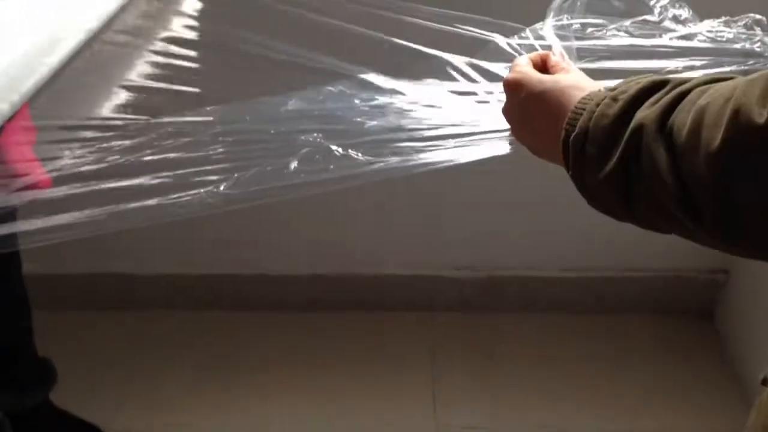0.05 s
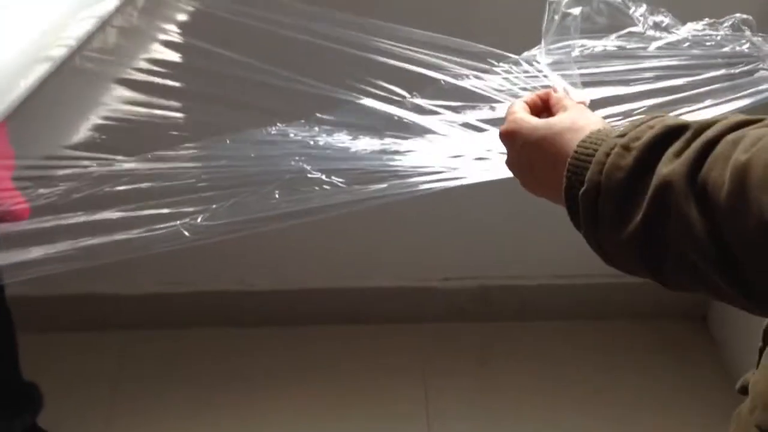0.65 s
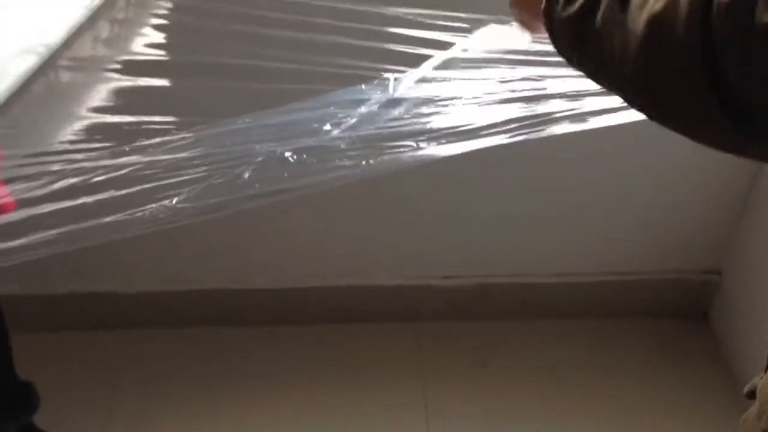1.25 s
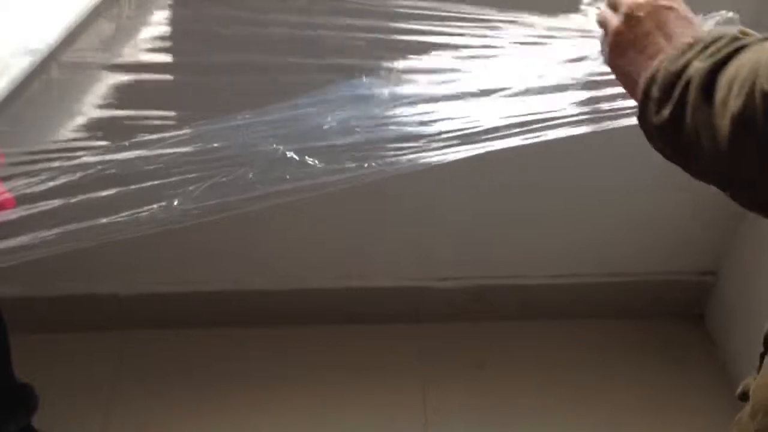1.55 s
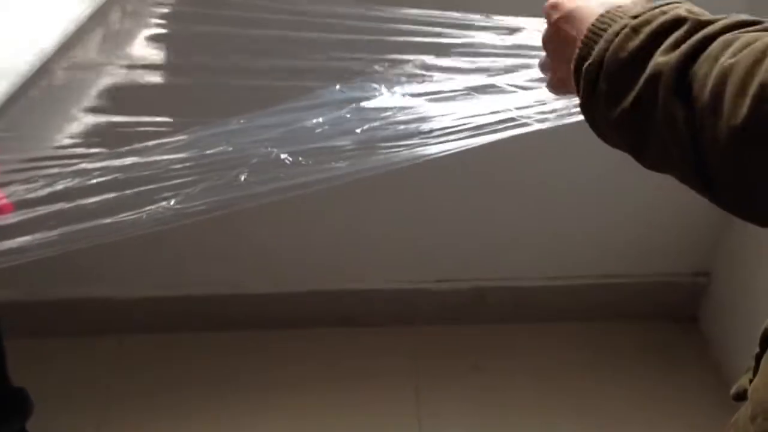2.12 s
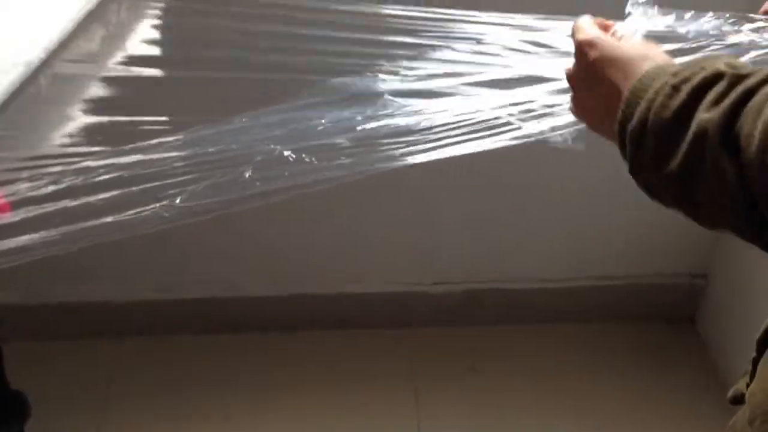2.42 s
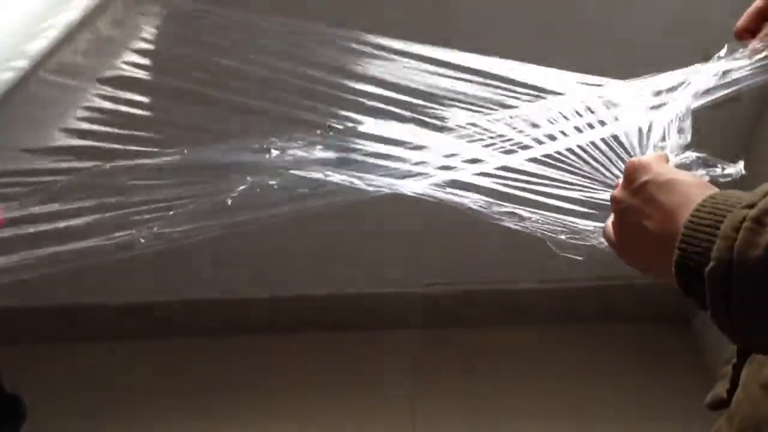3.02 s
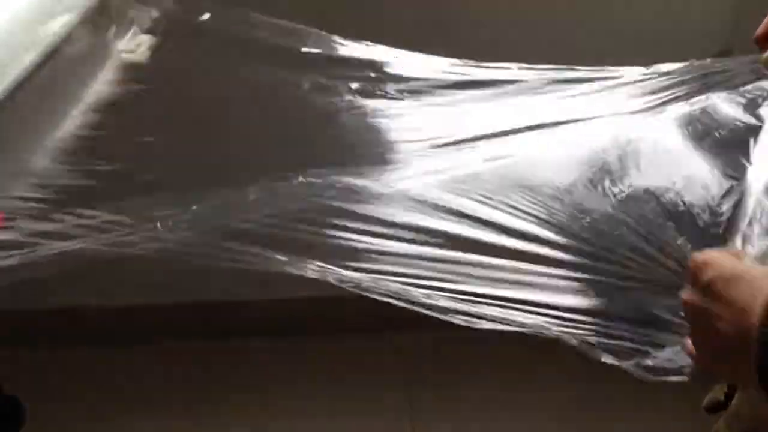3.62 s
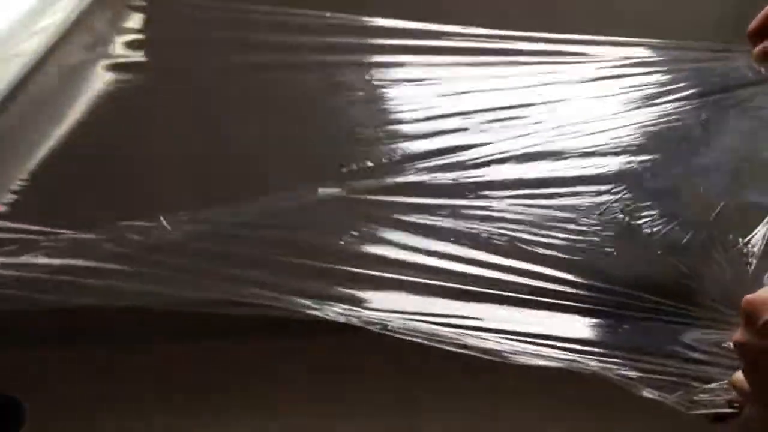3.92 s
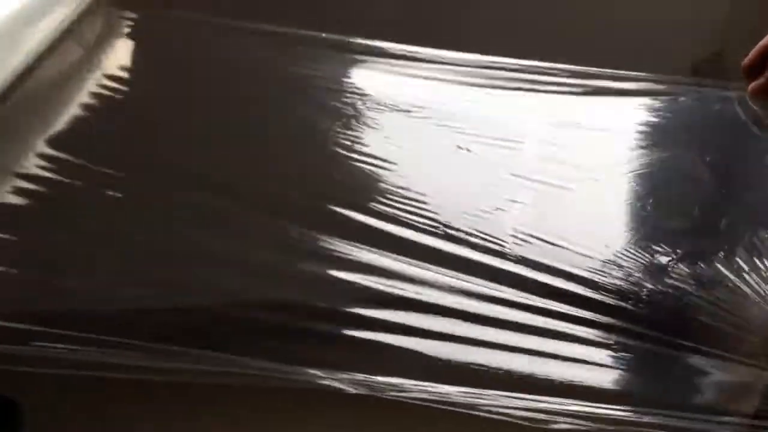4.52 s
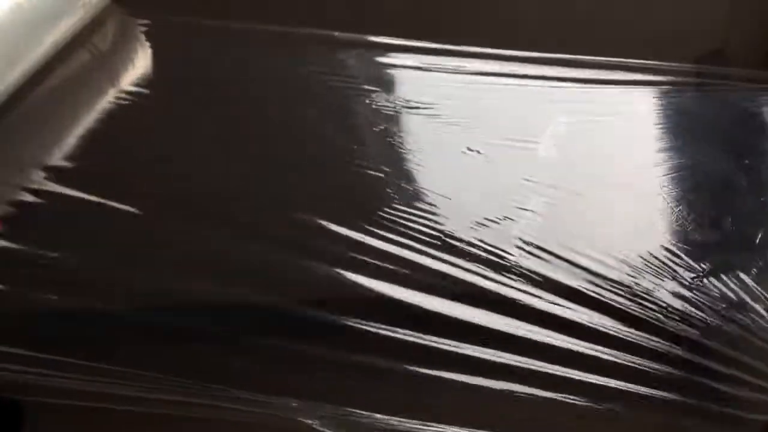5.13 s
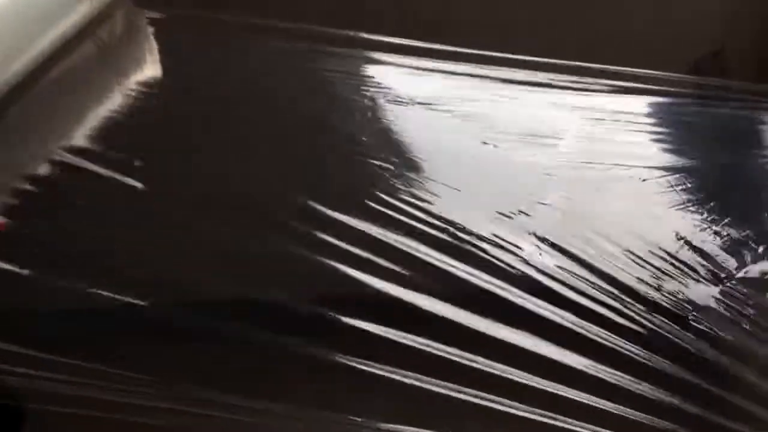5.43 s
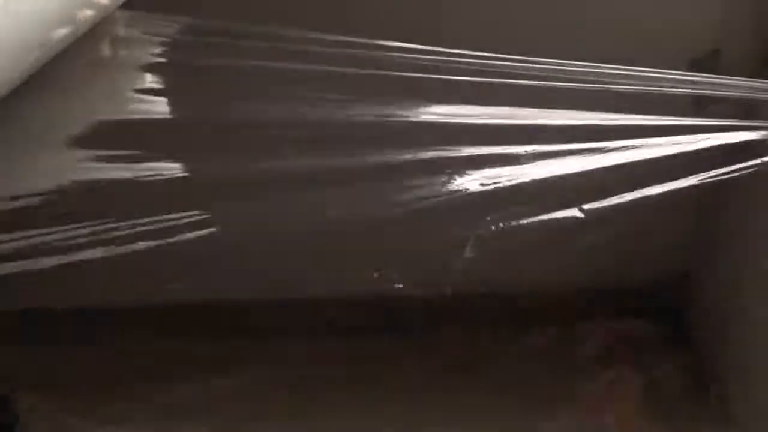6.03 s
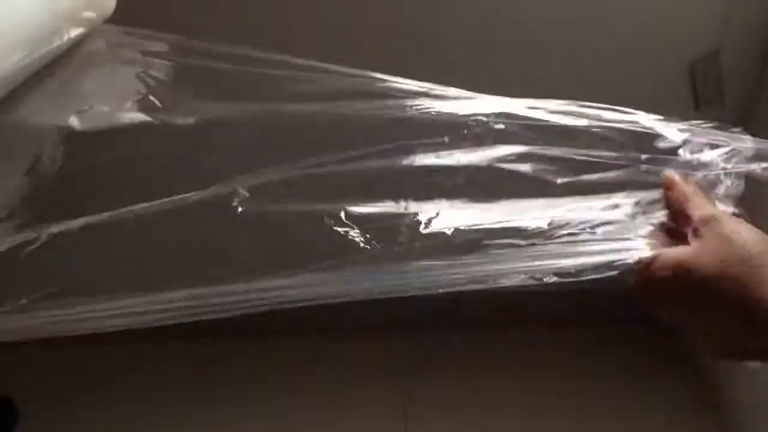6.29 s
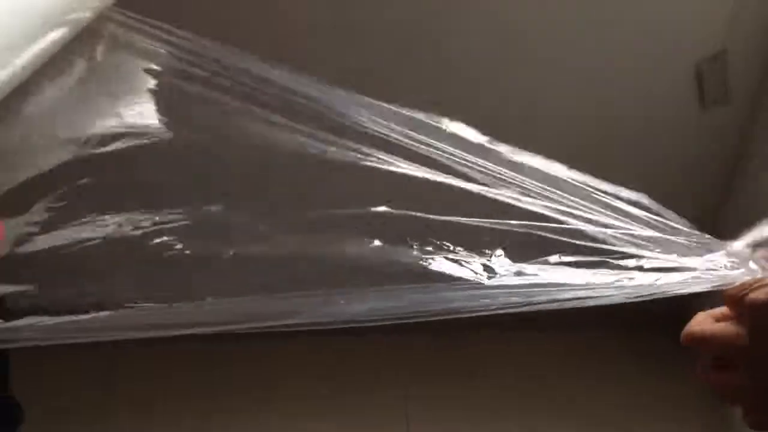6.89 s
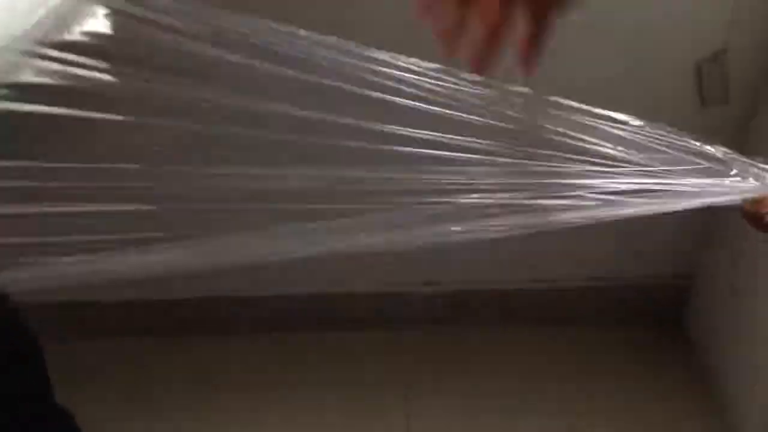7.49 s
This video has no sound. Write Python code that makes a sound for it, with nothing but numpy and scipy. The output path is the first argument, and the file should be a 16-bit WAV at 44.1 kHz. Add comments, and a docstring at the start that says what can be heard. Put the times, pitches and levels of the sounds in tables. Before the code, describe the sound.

Plastic stretch film is pulled and spread by hand, heard close in a small, bare room with a short ring and faint steady air noise. It opens with bright crinkling and a cluster of crisp bursts and ticks through the first second. Lighter, uneven crackling follows, with flurries around 1.5 to 1.9 seconds and a sharp snap at 2.7. From 3 seconds the crackle builds to a loud rush near 3.6 as clinging layers peel apart. Another burst at 4.3 carries a soft low flutter and pop as the sheet jerks taut, then a hard snap lands at 4.5. Separate, lower ticks lead into more loud crackles and snaps from 5.3 to 5.7. The film goes almost still around 5.9, resumes at 6.2 with light crinkling and scattered ticks, and swells into a strong crackle from 7.5 seconds to the end.

```python
"""A running crackle of plastic stretch film, pulled and spread by hand in a small, bare room.
Each tick is a crease buckling. Ticks crowd while the film is worked and come in avalanches where
clinging layers peel apart; a few large creases snap loudly. Underneath, the loose sheet flutters
and pops softly as it jerks taut. The room rings briefly over faint air noise."""
import sys
import numpy as np
from scipy import signal
from scipy.io import wavfile
from scipy.ndimage import uniform_filter1d

SR = 44100
rng = np.random.default_rng(int(sys.argv[2]) if len(sys.argv) > 2 else 0)


def inscribe(sig):
    """Save sig as 16-bit PCM at rate SR to the path in sys.argv[1].

    A 1-D sig is mono; a 2-D sig holds one channel per row.
    Samples are clipped to [-1, 1] before scaling.
    """
    pcm = np.round(np.clip(np.atleast_2d(sig).T, -1, 1) * 32767)
    wavfile.write(sys.argv[1], SR, pcm.astype(np.int16))


N = 341775

# state of the sheet: time_s, pitch_hz, flutter_db (relative to the crackle)
SHEET_STATE = [(0.03, 5120, -13), (0.45, 6130, -14.5), (1.0, 5240, -16.5), (2.95, 6040, -16),
               (3.12, 5000, -16), (3.35, 6360, -15.5), (4.15, 6600, -9.5), (4.35, 4620, -11),
               (4.8, 6700, -14.5), (5.2, 4200, -19), (5.4, 5310, -21.5), (5.6, 5180, -15),
               (6.19, 3820, -16.5), (6.45, 5620, -14), (7.7, 5220, -14.5)]


def sheet(jerk_decay_s=.0085, taut_drop_octaves=1.6):
    """Worked film crackles and flutters; a jerk pulls the creases long, so they briefly sound lower."""
    pitch_hz, flutter_db = follow(SHEET_STATE)
    level = np.sqrt(flurries() * pulls() + peels())
    flips = crease_flips(level)
    jerks = np.sqrt(burst_power(JERKS, jerk_decay_s))
    pitch_hz = pitch_hz * 2 ** (-taut_drop_octaves * jerks / (jerks + level))
    shake = flips * amp(flutter_db) + amp(-7) * jerks * rng.standard_normal(N) + pops()
    return crackle(flips, pitch_hz) + flutter(shake)


# colour the sheet gives its crackle: freq_hz, gain_db
FILM_COLOUR = [(300, -8), (800, 1), (1300, -1.5), (1900, 1), (2700, -3), (3500, -1), (5000, -1.5),
               (8000, 1), (11000, 2), (15000, 3.5)]


def crackle(flips, pitch_hz, spread_octaves=.65, drift_octaves=.36, kinds=8):
    """Each flip sounds at its crease's pitch: long taut ones low, crumpled ones high, neighbours alike."""
    kinds_hz = np.geomspace(1500, 14000, kinds)
    drift = unit_rms(uniform_filter1d(rng.standard_normal(N), size=500))
    octave = np.log2(pitch_hz) + drift_octaves * drift + spread_octaves * rng.standard_normal(N)
    kind = np.round(np.interp(octave, np.log2(kinds_hz), np.arange(kinds)))
    ticks = np.zeros(N)
    for k, hz in enumerate(kinds_hz):
        ticks += signal.oaconvolve(flips * (kind == k), buckle(hz, low_cut_ratio=.43))[:N]
    return colour(ticks, FILM_COLOUR)


def buckle(hz, low_cut_ratio):
    """One crease flips: a sharp crack, then a slower swing or two, as a small patch radiates no bass."""
    hz = np.clip(hz, 300, SR / 3)
    wave = signal.unit_impulse(256)
    for corner_hz in (hz, min(2 * hz, SR * .45)):
        wave = signal.lfilter(*signal.butter(1, corner_hz, fs=SR), wave)
    wave = signal.lfilter(*signal.butter(4, hz * low_cut_ratio, "high", fs=SR), wave)
    return wave / np.linalg.norm(wave)


def crease_flips(level, ref_per_s=2600, ref_db=-38, crowding=.6, spread_db=4):
    """Random impulses, mostly small; harder work makes them denser and stronger."""
    chance = np.clip(ref_per_s / SR * (level / amp(ref_db)) ** crowding, 1e-4, .5)
    size = unit_rms(amp(spread_db * np.minimum(rng.exponential(1, N), 4)))
    flips = (rng.random(N) < chance) * rng.choice([-1, 1], N)
    return flips * size * level / np.sqrt(chance)


def flurries(per_s=100, decay_s=.002, spread_db=2, steady_share=.44):
    """Power factor: one flip sets off its neighbours, so even steady pulling comes in flurries."""
    onsets = rng.random(N) < per_s / SR
    strength = amp(spread_db * np.minimum(rng.exponential(1, N), 3)) ** 2
    rises = uniform_filter1d(onsets * strength, size=160)
    power = signal.lfilter([1], [1, -np.exp(-1 / (decay_s * SR))], rises)
    power /= uniform_filter1d(power, size=SR // 12) + power.mean() / 10
    return steady_share + (1 - steady_share) * power


# hands pull or gather the film: start_s, length_s, level_db
HAND_PULLS = [(-0.03, 0.055, -33), (0.328, 0.079, -45), (0.412, 0.17, -42), (0.604, 0.38, -42),
              (1.016, 0.13, -37.5), (1.454, 0.066, -36.5), (1.585, 0.043, -32), (1.814, 0.12, -41),
              (1.93, 0.61, -46), (2.46, 0.43, -38), (2.931, 0.15, -34.5), (3.065, 0.075, -30.5),
              (3.162, 0.16, -35), (3.353, 0.125, -37), (3.5, 0.028, -25.5), (3.59, 0.2, -25.5),
              (4.249, 0.033, -40), (4.301, 0.026, -31.5), (4.447, 0.15, -47.5), (5.088, 0.22, -38),
              (5.316, 0.14, -33), (5.521, 0.063, -29), (5.79, 0.034, -45.5), (6.166, 0.4, -48),
              (6.433, 0.077, -34.5), (6.685, 0.26, -45.5), (7.125, 0.34, -49.5), (7.47, 0.04, -39.5),
              (7.512, 0.14, -31), (7.668, 0.14, -22.5)]


def pulls(grip_s=.025, relax_s=.037, held_db=-52, still_db=-66, uneven_db=1, uneven_s=.03):
    """Crackle power: held film ticks faintly; each pull grips, holds unevenly and relaxes."""
    t = np.arange(N) / SR
    hanging_still = (t > 5.89) & (t < 6.18)
    power = amp(np.where(hanging_still, still_db, held_db)) ** 2
    for start_s, length_s, level_db in HAND_PULLS:
        grip = np.clip((t - start_s) / grip_s, 0, 1)
        relax = np.exp(-np.maximum(t - start_s - length_s, 0) / relax_s)
        power += (amp(level_db) * grip * relax) ** 2
    wander = np.interp(t / uneven_s, np.arange(N), rng.standard_normal(N))
    return power * amp(uneven_db * wander) ** 2


# layers peel apart: start_s, level_db
LAYER_PEELS = [(0.01, -41), (0.035, -31.5), (0.266, -34.5), (0.356, -35.5), (0.426, -27), (0.476, -20.5),
               (0.512, -26), (0.57, -22), (0.59, -26), (0.705, -26), (0.884, -29.5), (0.91, -34),
               (1.23, -32.5), (1.328, -34), (1.461, -31.5), (1.506, -29), (1.59, -27), (1.797, -31.5),
               (1.829, -28.5), (1.882, -23), (2.259, -29), (2.618, -27.5), (2.756, -30), (2.875, -32),
               (3.586, -19.5), (3.645, -14.5), (3.709, -21), (3.757, -18), (4.094, -26), (4.109, -34),
               (4.241, -27.5), (4.31, -14.5), (5.176, -25), (5.338, -19), (5.456, -24.5), (5.535, -26),
               (5.56, -19), (5.587, -13.5), (5.848, -29), (6.18, -26.5), (6.762, -30), (7.517, -23.5)]


def peels():
    """Crackle power: clinging layers let go, each time in one short avalanche."""
    return burst_power(LAYER_PEELS, decay_s=.0085)


# large creases: start_s, peak_db, pitch_hz
CREASE_SNAPS = [(0.2975, -26, 9000), (0.3453, -15.5, 7500), (0.369, -16, 9100), (0.4095, -19, 9100),
                (0.4767, -17, 6200), (2.6743, -10, 6700), (3.6487, -17, 4570), (4.11, -10, 9600),
                (4.1585, -16.5, 4470), (4.5035, -5.5, 3440), (4.5613, -22, 8400), (4.711, -30.5, 2220),
                (4.7572, -24.5, 2980), (4.7851, -19, 2570), (4.8, -34, 1740), (4.808, -37, 1730),
                (4.858, -29, 8050), (4.911, -25.5, 6100), (4.9918, -21.5, 3240), (5.11, -17.5, 2550),
                (5.137, -20, 2540), (5.1757, -17, 2570), (5.2978, -10, 3640), (5.563, -5, 4480),
                (5.6852, -10.5, 5360), (6.454, -18, 7000), (6.805, -21, 7000), (6.859, -22.5, 8600),
                (6.89, -27, 3800), (6.9224, -20.5, 6900), (7.159, -29, 8000)]


def snaps(ref_corner_hz=5600, ref_pitch_hz=2400):
    """Large creases buckle singly; the lower the pitch, the less treble."""
    out = np.zeros(N)
    for start_s, peak_db, pitch_hz in CREASE_SNAPS:
        corner_hz = min(ref_corner_hz * (pitch_hz / ref_pitch_hz) ** 2, SR * .45)
        wave = signal.lfilter(*signal.butter(2, corner_hz, fs=SR), buckle(pitch_hz, low_cut_ratio=.47))
        add(out, start_s, amp(peak_db) * wave / abs(wave).max())
    return out


# low flutter of the loose sheet, with the room's low resonances near 135 and 270 Hz: freq_hz, gain_db
FLUTTER_COLOUR = [(20, 1), (45, 4), (70, 0), (100, -16), (135, 7.5), (190, -3.5), (270, 0.5), (400, -3.5),
                  (600, -2), (1000, -5), (2500, -36.5)]


def flutter(shake):
    """Shaken, the wide, loose sheet flutters low, coloured by the room's low resonances."""
    impulse_response = colour(signal.unit_impulse(SR // 10), FLUTTER_COLOUR)
    return colour(shake, FLUTTER_COLOUR) / np.linalg.norm(impulse_response)


# the loose sheet jerks taut: start_s, level_db
JERKS = [(0.703, -47), (0.906, -41), (1.59, -42.5), (1.831, -50), (2.257, -46.5), (2.753, -43),
         (3.095, -38), (4.312, -32), (5.297, -39), (5.337, -39.5), (5.586, -36), (5.846, -49.5),
         (6.179, -41), (6.887, -49)]


def pops(swing_hz=300, decay_s=.0013):
    """Each jerk swings the whole sheet out and back once."""
    out, t = np.zeros(N), np.arange(SR // 50) / SR
    swing = np.gradient(np.sin(2 * np.pi * swing_hz * t) * t * np.exp(-t / decay_s))
    for start_s, level_db in JERKS:
        add(out, start_s, amp(level_db) * swing / abs(swing).max() / 2)
    return out


def echo(x, delay_s=.0049, sway_s=.00084, sway_hz=.45):
    """A near surface throws the sound back; the path changes as the hands move."""
    t = np.arange(N) / SR
    return np.interp(t - delay_s - sway_s * np.sin(2 * np.pi * sway_hz * t), t, x)


# ring of the room: freq_hz, t60_s
ROOM_DECAY = [(100, 0.44), (260, 0.56), (700, 0.3), (1840, 0.3), (4850, 0.3), (12800, 0.2)]


def room(x, build_s=.0008, patches=12, patch_samples=300):
    """Dense reflections, each band dying at its own rate; each patch of the sheet has its own tail."""
    hz, t, bands = signal.stft(rng.standard_normal((patches, SR // 2)), SR, nperseg=256)
    decay = amp(-60 * t / at_freq(ROOM_DECAY, hz)[:, None])
    _, tails = signal.istft(bands * decay, SR, nperseg=256)
    tails *= 1 - np.exp(-np.arange(tails.shape[1]) / SR / build_s)
    tails /= np.linalg.norm(tails, axis=1, keepdims=True)
    position = np.arange(patches * patch_samples) / patch_samples
    out = np.zeros(N)
    for k, tail in enumerate(tails):
        distance = abs((position - k) % patches - patches / 2)
        share = np.resize(np.cos(np.pi / 2 * np.minimum(distance, 1)), N)  # equal-power crossfade
        out += signal.oaconvolve(x * share, tail)[:N]
    return out


# air noise spectrum: freq_hz, gain_db
AIR_COLOUR = [(20, 13), (60, -0.5), (100, -4), (142, 5.5), (190, -9), (300, -7.5), (600, -14.5),
              (2000, -12), (8000, -21.5), (15000, -25)]


def air(rms_db=-58):
    """Still air in the room: a faint, steady noise."""
    return amp(rms_db) * unit_rms(colour(rng.standard_normal(N), AIR_COLOUR))


def amp(db):
    return 10 ** (np.asarray(db) / 20)


def unit_rms(x):
    return x / np.sqrt(np.mean(x ** 2) + 1e-20)


def at_freq(table, hz):
    """Table value on a log-frequency axis."""
    freq_hz, value = np.transpose(table)
    return np.interp(np.log(hz + 1), np.log(freq_hz + 1), value)


def follow(table):
    """Table columns, interpolated per sample."""
    time_s, *columns = np.transpose(table)
    return [np.interp(np.arange(N) / SR, time_s, column) for column in columns]


def add(mix, start_s, sound):
    part = mix[max(round(start_s * SR), 0):][:len(sound)]
    part += sound[:len(part)]


def burst_power(table, decay_s, rise_s=.003):
    """Power of bursts that rise fast and die away."""
    power, t = np.zeros(N), np.arange(SR // 4) / SR
    shape = np.minimum(t / rise_s, 1) * np.exp(-t / decay_s)
    for start_s, level_db in table:
        add(power, start_s, (amp(level_db) * shape) ** 2)
    return power


def colour(x, spectrum, size=4096):
    """Minimum-phase filter with the given spectrum."""
    hz = abs(np.fft.fftfreq(size, 1 / SR))
    log_gain = np.log(amp(at_freq(spectrum, hz)))
    response = np.exp(np.conj(signal.hilbert(log_gain)))
    taps = np.fft.ifft(response).real[:size // 2]
    return signal.oaconvolve(x, taps)[:N]


def scene():
    """The sheet and its snaps, heard close by in the room; mono."""
    film = amp(-2) * sheet()
    cracks = snaps()
    early = echo(amp(-13.5) * film + amp(-10.5) * cracks)
    ring = room(amp(-2) * film + amp(-7) * cracks)
    return (film + cracks + early + ring + air())[None]


def record(dry, low_cut_hz=58, high_cut_hz=15500):
    """A small microphone loses the deepest bass; a steep low-pass ends the treble."""
    heard = signal.lfilter(*signal.butter(4, low_cut_hz, "high", fs=SR), dry)
    low_pass = signal.firwin(511, high_cut_hz, window=("kaiser", 9), fs=SR)
    return signal.oaconvolve(heard, low_pass[None], "same")


dry = scene()
out = record(dry)
inscribe(out)
```